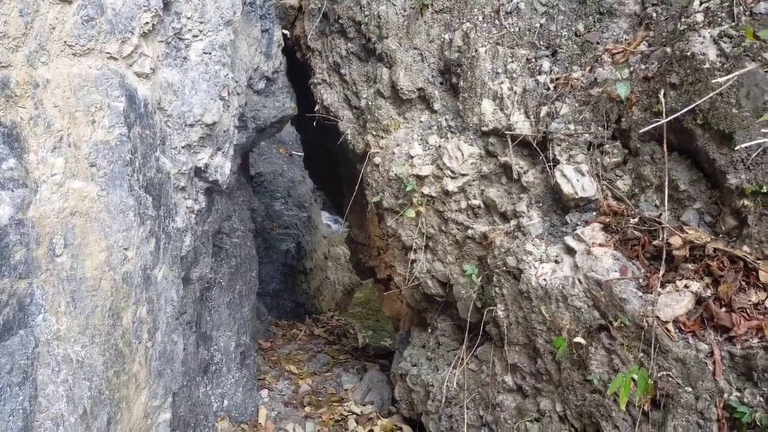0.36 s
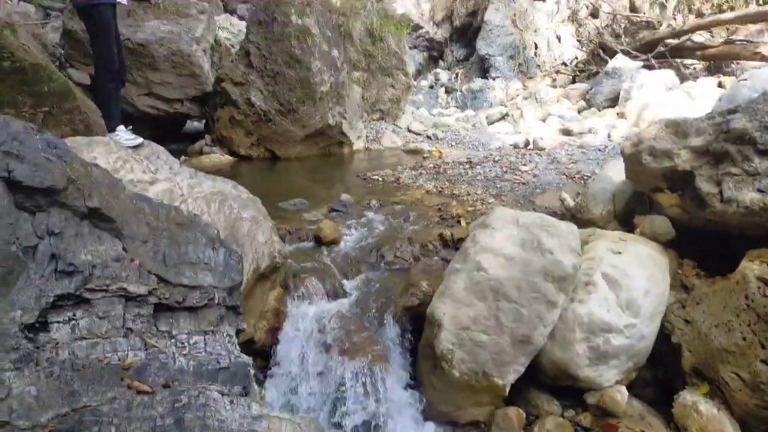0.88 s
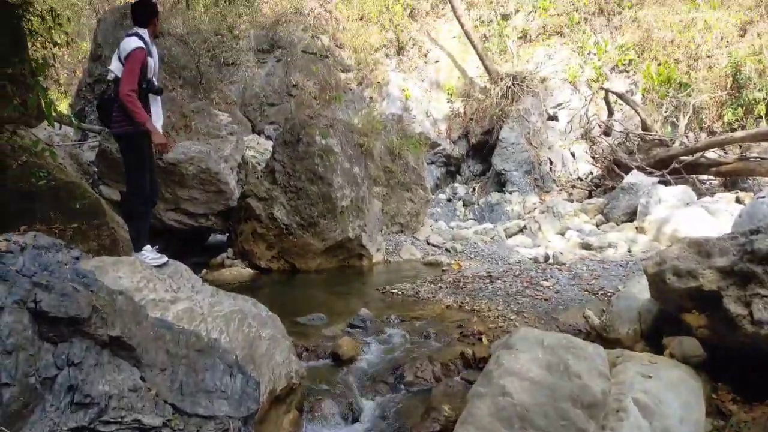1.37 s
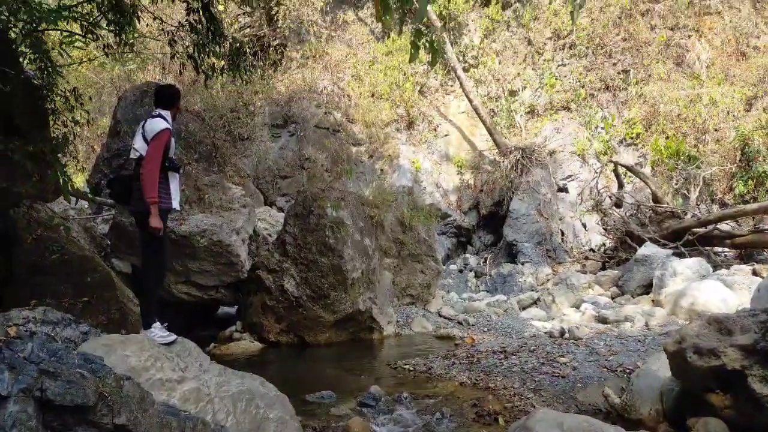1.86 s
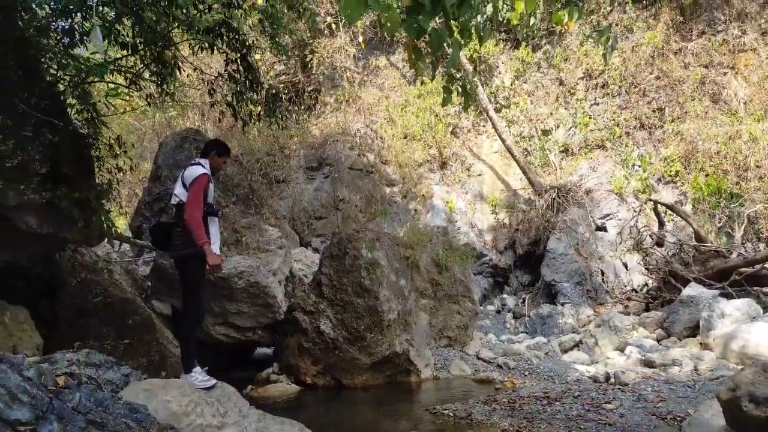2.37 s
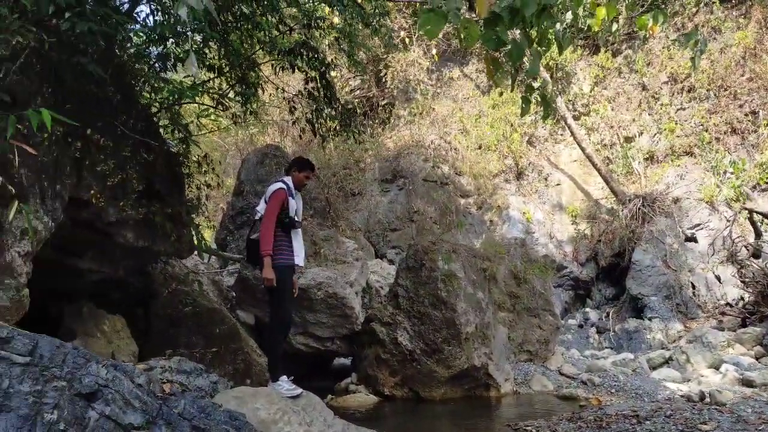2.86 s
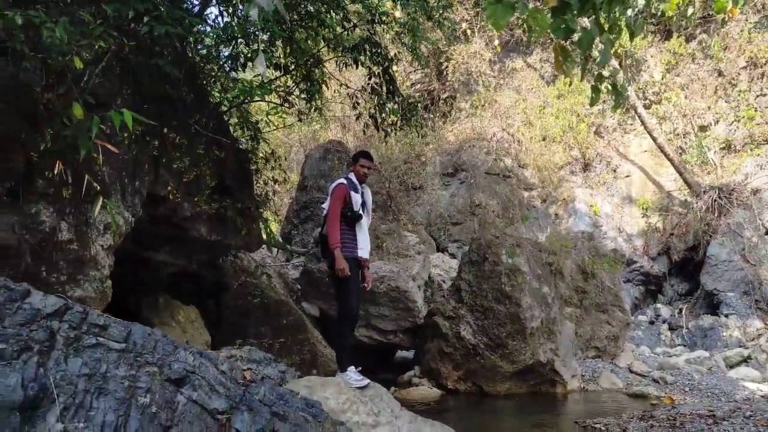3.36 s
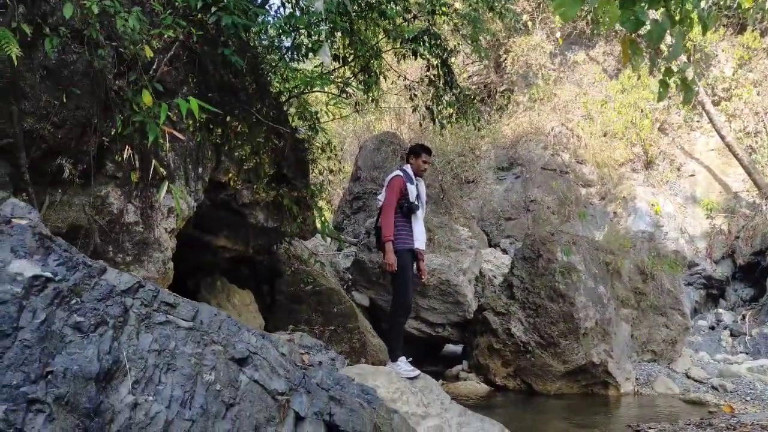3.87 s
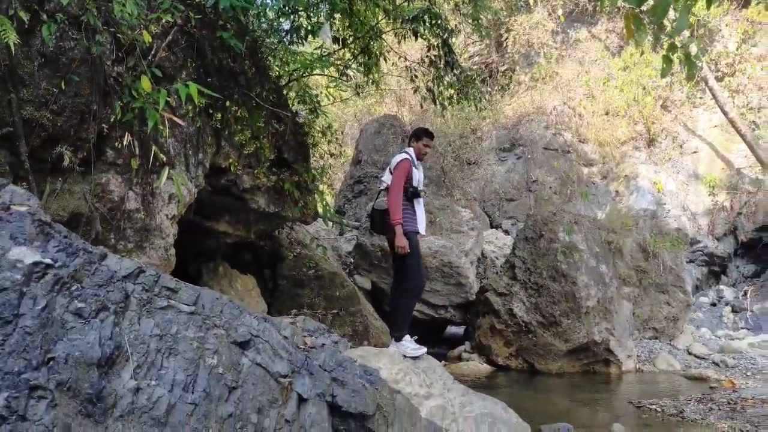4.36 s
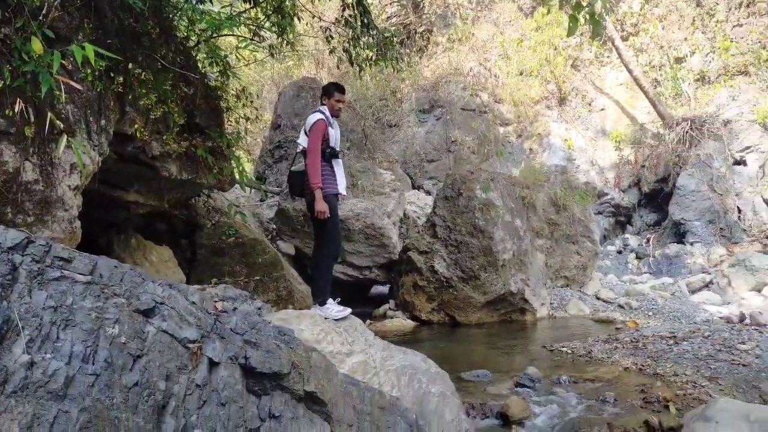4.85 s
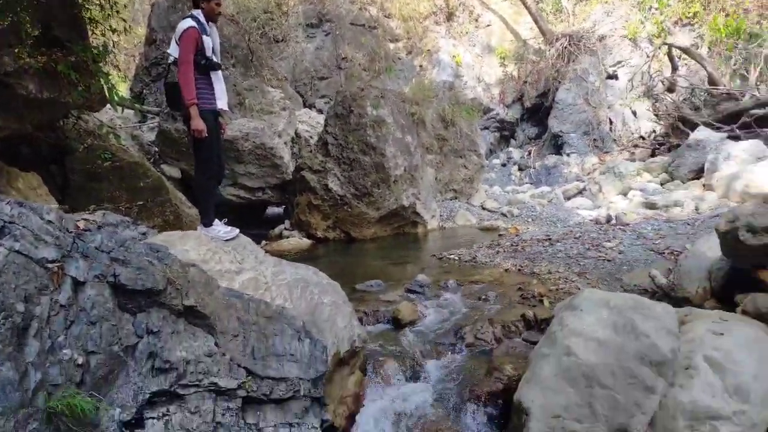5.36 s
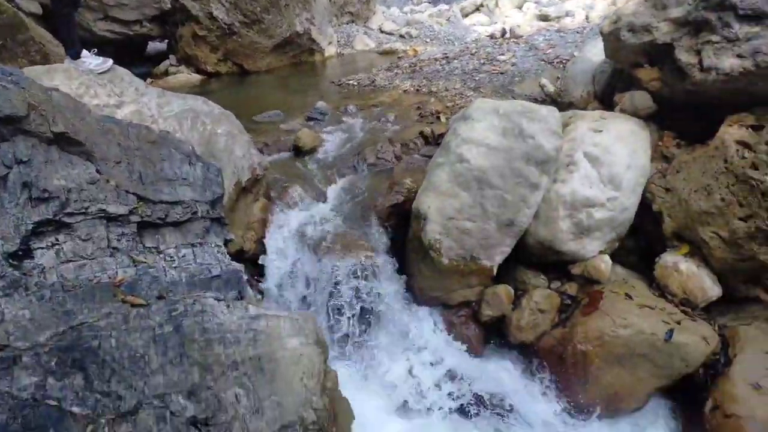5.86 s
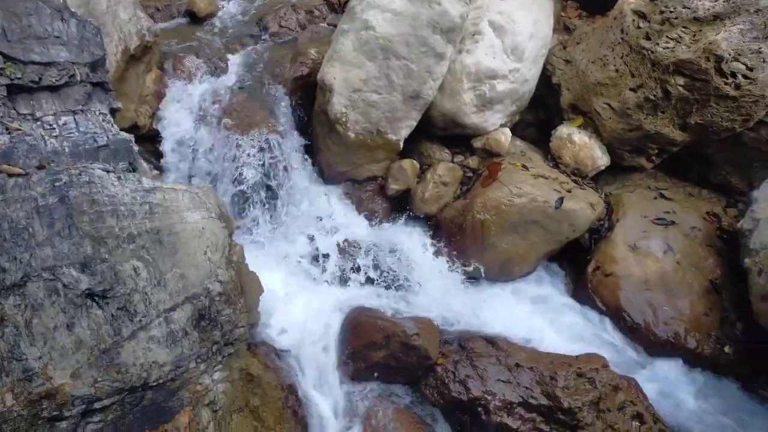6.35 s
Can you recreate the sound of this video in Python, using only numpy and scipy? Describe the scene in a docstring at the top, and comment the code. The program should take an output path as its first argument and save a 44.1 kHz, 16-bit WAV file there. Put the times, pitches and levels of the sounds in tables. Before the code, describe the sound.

In a rocky gorge, a very quiet, dull rush of distant water is heard through a cleft, with low lumpy wind on the microphone and one tiny tick. A short total silence follows. Then a mountain stream cascades close by, dense hissing spray over a softer pool rumble, steady and growing slightly louder towards the end. Small microphone, identical in both channels, no high treble.

```python
"""A rocky gorge, where a mountain stream falls over boulders: two shots on one small microphone.
First the dull far rush of a narrow cleft, with lumpy low wind noise and one soft tick; then silence;
then the cascade close by, a rumbling pool under hissing spray, recoloured as the microphone swings.
Both waters are one sum of noise-driven and bubble-driven resonators, filtered to each source's spectrum."""
import sys
import numpy as np
from scipy import signal
from scipy.fft import rfft, irfft, next_fast_len
from scipy.io import wavfile

SR = 44100
rng = np.random.default_rng(int(sys.argv[2]) if len(sys.argv) > 2 else 0)


def dump(signal):
    """Clip the signal to [-1, 1] and save it as 16-bit WAV at the path in sys.argv[1]."""
    limited = np.clip(np.atleast_2d(signal).T, -1, 1)
    pcm = np.round(limited * 32767).astype(np.int16)
    wavfile.write(sys.argv[1], SR, pcm)


def to_linear_factor(level_db):
    """Convert decibel levels (scalar or array-like) to linear amplitude factors."""
    exponent = np.asarray(level_db, float) / 20
    return 10 ** exponent


N = 285768   # length in samples

# Steep low-pass of the recorder: f/Hz, gain/dB
RECORDER_LOW_PASS = [(7200, -3.5), (7600, -3.5), (8000, -13), (8240, -12), (8320, -28.5), (8450, -45.5),
                     (8600, -58.5)]
# Relative spectral density of the far rush from the cleft: f/Hz, level/dB per Hz
CLEFT_SPECTRUM = [(88, -32), (150, -2), (179, -10), (215, -2), (249, -8), (334, -8.5), (518, -17.5),
                  (695, -12), (792, -11.5), (1050, -16.5), (1910, -9.5), (2650, -13), (3490, -23),
                  (4840, -20.5), (7400, -21), (9620, -49), (16300, -120)]
# Wind puffs on the microphone, added to the steady wind amplitude: t/s, level/dB
WIND_PUFFS = [(0.14, -52), (0.278, -48)]
# Small tick in the cleft, level of its envelope at onset: t/s, level/dB
CLEFT_TICK = [(0.324, -28.5)]
# Close shot: t/s, spray level/dB, pool level/dB, how far the microphone faces the fall/0-1
CASCADE_COURSE = [(0.66, -24.5, -37, 0.95), (0.9, -23.5, -36, 0.68), (1.6, -23, -34.5, 0.37),
                  (2.5, -23, -33, 0.03), (3.6, -22, -31.5, 0.04), (4.7, -21.5, -31, 0.1),
                  (5.5, -20, -30, 0.32), (6.0, -18, -30.5, 0.5), (6.48, -18.5, -32.5, 0.75)]
# Relative spectral density of spray heard head-on: f/Hz, level/dB per Hz
SPRAY_HEAD_ON = [(530, -50), (900, -24.5), (1350, -7.5), (1580, -6), (1620, -5), (1810, -8), (1970, 0),
                 (2660, -1.5), (3620, -18.5), (4800, -16), (5530, -24.5), (6660, -24), (7400, -28),
                 (9620, -55.5), (16300, -120)]
# The same heard head-on from nearer: f/Hz, level/dB per Hz
SPRAY_HEAD_ON_NEAR = [(530, -42), (900, -21.5), (1140, -11.5), (1550, -3), (1670, -7), (1950, -0.5),
                      (2150, 0), (2460, 0.5), (3440, -17), (4680, -14.5), (5830, -25.5), (6540, -20),
                      (7400, -27.5), (9620, -57.5), (16300, -120)]
# The same heard from the side: f/Hz, level/dB per Hz
SPRAY_FROM_SIDE = [(530, -41.5), (900, -19.5), (1180, -9.5), (1350, -4.5), (1640, -4), (2030, 0),
                   (2440, -3), (3560, -25.5), (4140, -18.5), (4680, -17), (6600, -22), (7400, -26),
                   (9620, -55), (16300, -120)]
# Relative spectral density of the plunge pool and rock hollows: f/Hz, level/dB per Hz
POOL_SPECTRUM = [(13, -44.5), (22, -14.5), (54, -3.5), (87, -5), (118, 2.5), (135, 0), (163, -5.5),
                 (215, -1.5), (257, -3), (355, 0), (507, -5.5), (724, -3), (851, -5), (1050, -9),
                 (1360, -30), (2310, -120)]

FAR_END_S, CLOSE_START_S = 0.3775, 0.6596   # silence lies between the shots
APPROACH_S = 2.0, 5.0   # the microphone drifts nearer to the fall between these times


def rms_one(x):
    """Normalisation: scale a signal to unit root-mean-square."""
    return x / np.sqrt(np.mean(x ** 2) + 1e-20)


def in_time(rows):
    """Linear interpolation: each column of a time table becomes one value a sample."""
    t, *columns = np.transpose(rows)
    return [np.interp(np.arange(N) / SR, t, column) for column in columns]


def colour(white, spectrum):
    """Linear filtering: shape a white signal by a spectrum and the recorder's low-pass, to rms 1."""
    size = next_fast_len(N)
    log_f = np.log(np.maximum(np.arange(size // 2 + 1) * SR / size, 1))
    gain_db = 0
    for table in (spectrum, RECORDER_LOW_PASS):
        hz, db = np.transpose(table)
        gain_db = gain_db + np.interp(log_f, np.log(hz), db)
    return rms_one(irfft(rfft(white, size) * to_linear_factor(gain_db), size)[:N])


def drift(corner_hz):
    """Low-pass random process: two equal real poles slow white noise to a wander of spread 1."""
    hop, settle = 40, 2000   # samples per step; steps discarded while the filter settles
    pole = np.exp(-2 * np.pi * corner_hz * hop / SR)
    noise = rng.standard_normal(N // hop + settle + 2)
    slow = signal.lfilter([1], [1, -2 * pole, pole * pole], noise)[settle:]
    return np.interp(np.arange(N) / hop, np.arange(len(slow)), rms_one(slow))


def white_water(per_cycle, spread_db, cycles, bubble_db, surge_db, flicker_db):
    """Bubble resonance: bubbles of many sizes ring over the blur of countless far ones; flat spectrum.

    per_cycle: births per period; cycles: periods to decay by 60 dB; bubble_db: bubbles over blur."""
    water = np.zeros(N)
    surge = surge_db * drift(6.2)   # dB, common to all pitches
    for hz in np.geomspace(30, 8500, 34):
        born = rng.random(N) < per_cycle * hz / SR   # small bubbles are born more often
        strength = to_linear_factor(spread_db * np.minimum(rng.exponential(1, N), 4))
        impulses = born * strength * rng.choice([-1, 1], N)
        drive = rng.standard_normal(N) + to_linear_factor(bubble_db) * rms_one(impulses)
        radius = np.exp(-np.log(1000) * hz / (cycles * SR))
        angle = 2 * np.pi * hz / SR
        ring = signal.lfilter([1, 0, -1], [1, -2 * radius * np.cos(angle), radius * radius], drive)
        level = to_linear_factor(surge + flicker_db * drift(15.0))
        water += np.sqrt(hz) * rms_one(ring) * level   # bandwidth grows with pitch: equal density
    return water


def far_rush(water):
    """Spectral colouring by distance and the cleft: the water sounds dull at a steady level."""
    rush_db = -46.5
    return to_linear_factor(rush_db) * colour(water, CLEFT_SPECTRUM)


def wind():
    """Amplitude modulation: low band noise on the microphone swells in Gaussian puffs."""
    between_puffs_db, half_width_s = -55, 0.016   # half-width at 1/e of the peak
    t = np.arange(N) / SR
    strength = to_linear_factor(between_puffs_db)
    for s, db in WIND_PUFFS:
        strength = strength + to_linear_factor(db) * np.exp(-((t - s) / half_width_s) ** 2)
    band = signal.butter(2, [25.0, 110.0], "band", fs=SR, output="sos")
    rumble = rms_one(signal.sosfilt(band, rng.standard_normal(N)))
    lumps = to_linear_factor(2 * drift(20))   # 2 dB of random unevenness
    return strength * lumps * rumble


def tick():
    """Damped oscillation: a 1 kHz sine dies exponentially within a few milliseconds."""
    decay_s = 0.0004
    out = np.zeros(N)
    t = np.arange(400) / SR
    for s, db in CLEFT_TICK:
        at = round(s * SR)
        out[at:at + len(t)] += to_linear_factor(db) * np.sin(2 * np.pi * 1000.0 * t) * np.exp(-t / decay_s)
    return out


def spray(water, facing):
    """Directional colouring: the spectrum blends between head-on and side as the microphone swings."""
    near = np.interp(np.arange(N) / SR, APPROACH_S, [0, 1])
    head_on = near * colour(water, SPRAY_HEAD_ON_NEAR) + (1 - near) * colour(water, SPRAY_HEAD_ON)
    return facing * head_on + (1 - facing) * colour(water, SPRAY_FROM_SIDE)


def pool(water):
    """Cavity colouring: the plunge pool and rock hollows keep the low frequencies."""
    return colour(water, POOL_SPECTRUM)


def cascade(water):
    """Superposition: spray and pool add, each following its own level in time."""
    spray_db, pool_db, facing = in_time(CASCADE_COURSE)
    facing = np.clip(facing, 0, 1)
    return to_linear_factor(spray_db) * spray(water, facing) + to_linear_factor(pool_db) * pool(water)


def input_offset():
    """Exponential relaxation: the input starts the close shot with an offset that drains away."""
    offset_db, settle_s = -26.5, 0.075
    since = np.arange(N) / SR - CLOSE_START_S
    return to_linear_factor(offset_db) * np.exp(-np.maximum(since, 0) / settle_s) * (since >= 0)


def scene():
    """Gating in time: the far shot, silence, then the close shot, alike in both channels."""
    t = np.arange(N) / SR
    water = white_water(per_cycle=0.15, spread_db=3.5, cycles=7.7, bubble_db=-6.0,
                        surge_db=0.5, flicker_db=0.16)
    far = far_rush(water) + wind() + tick()
    mono = far * (t < FAR_END_S) + cascade(water) * (t >= CLOSE_START_S)
    return np.array([mono, mono])


def band_limit(x):
    """A steep low-pass at the top of the band."""
    return signal.sosfilt(signal.butter(12, 8580, fs=SR, output="sos"), x)


def record(dry):
    """Superposition: the draining input offset adds to the sound in both channels."""
    mix = dry + input_offset()
    return band_limit(mix)


dry = scene()
out = record(dry)
dump(out)
```